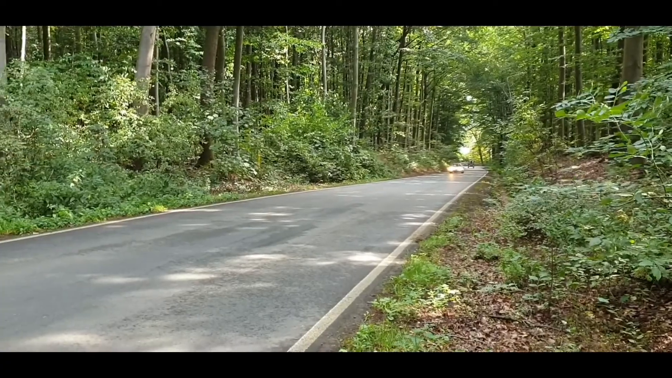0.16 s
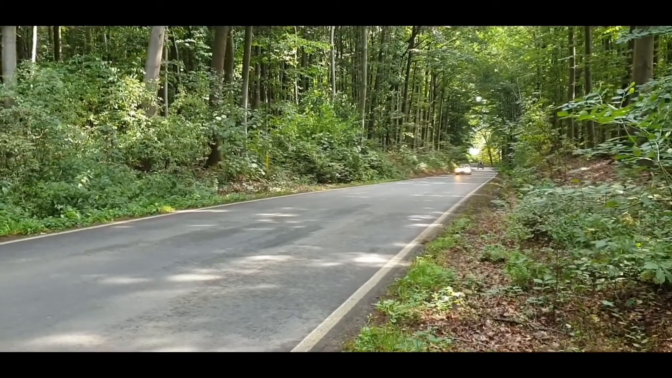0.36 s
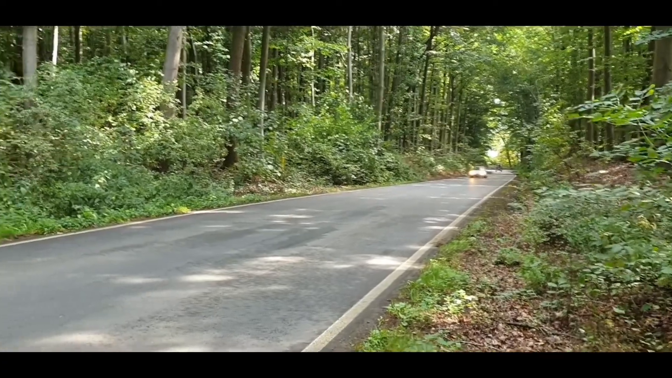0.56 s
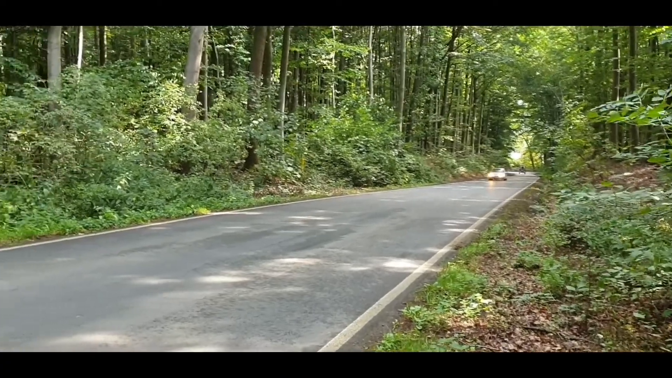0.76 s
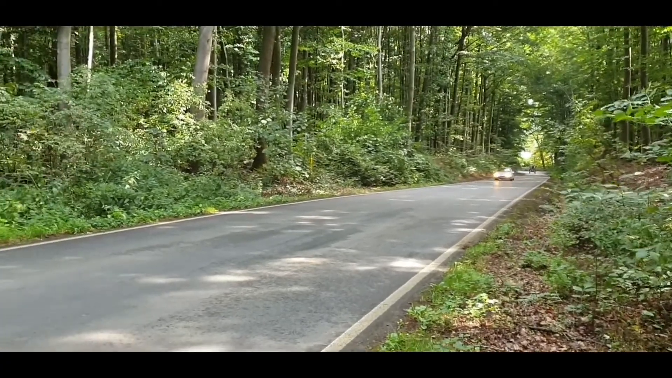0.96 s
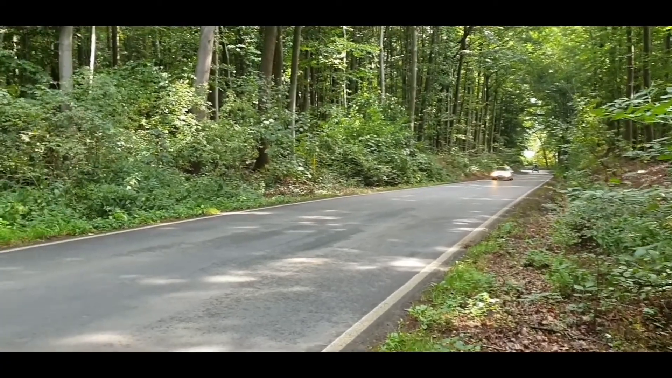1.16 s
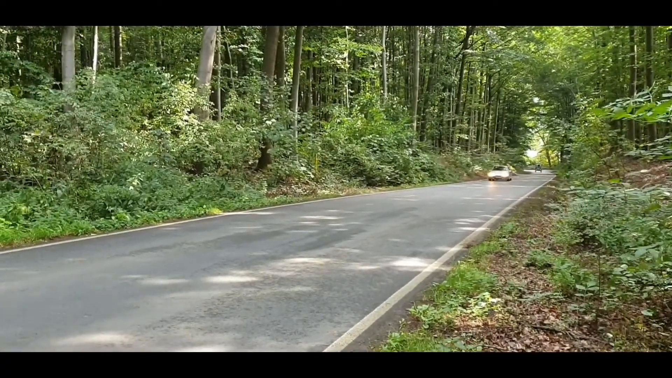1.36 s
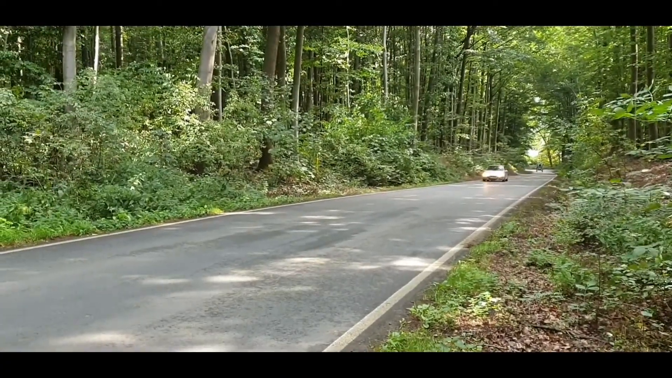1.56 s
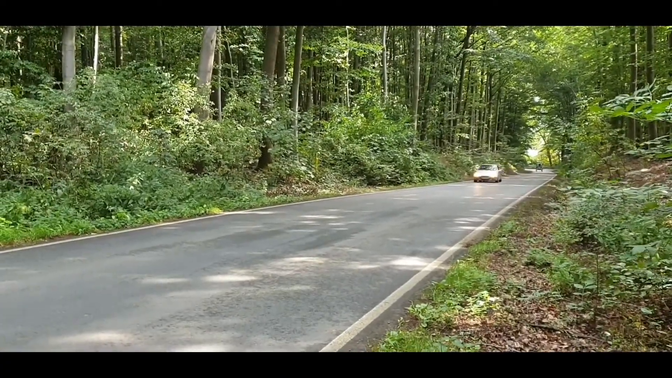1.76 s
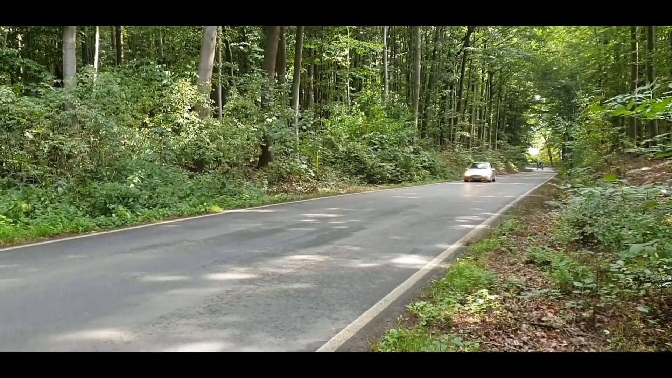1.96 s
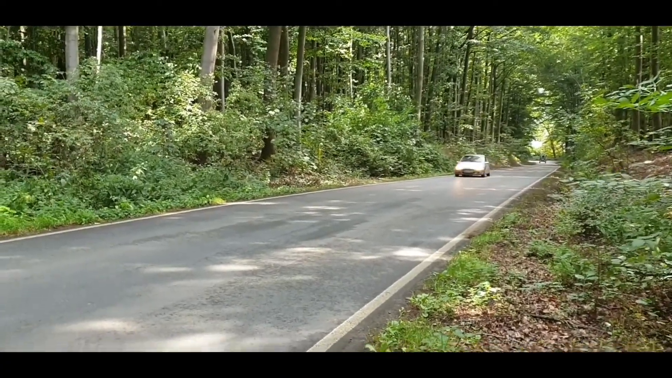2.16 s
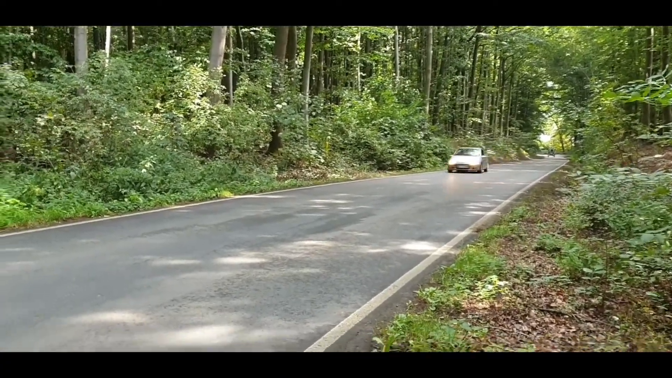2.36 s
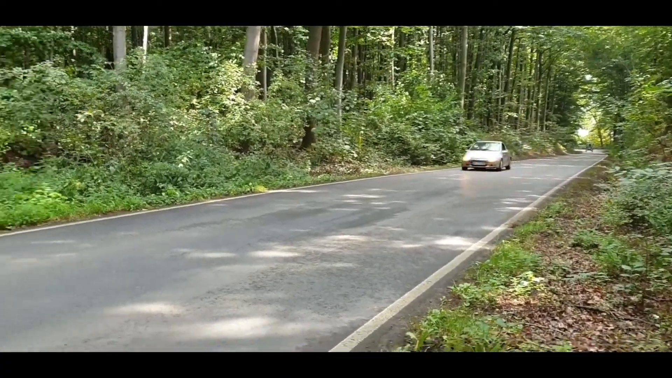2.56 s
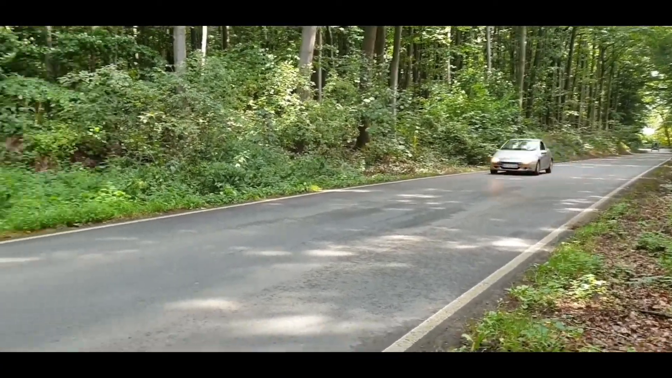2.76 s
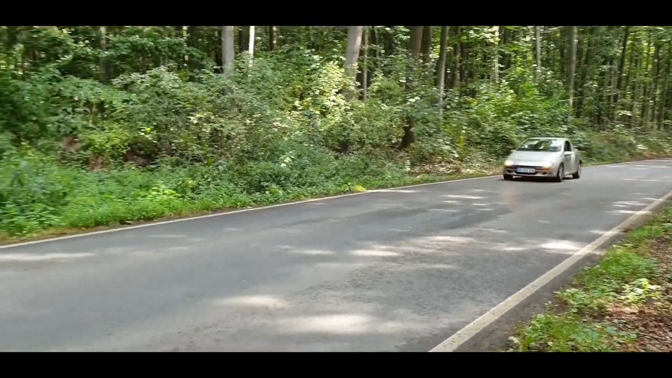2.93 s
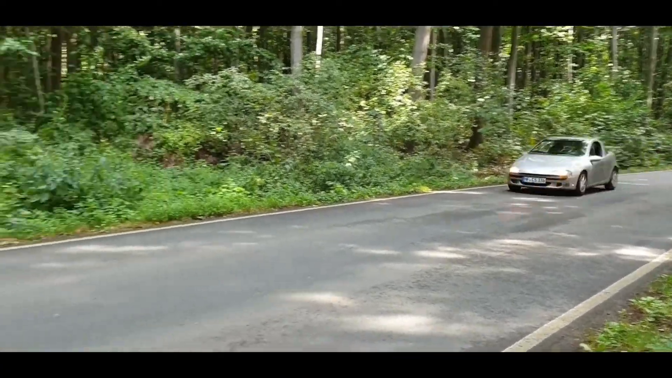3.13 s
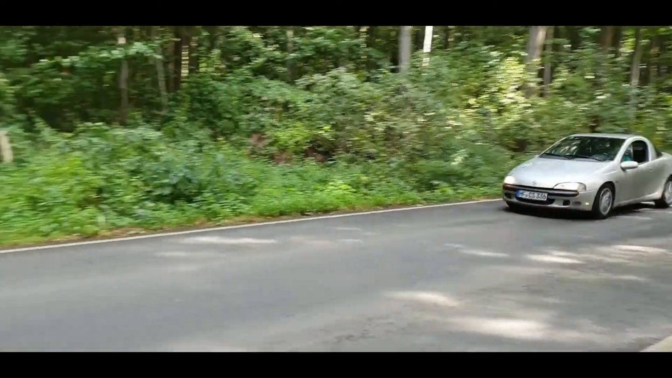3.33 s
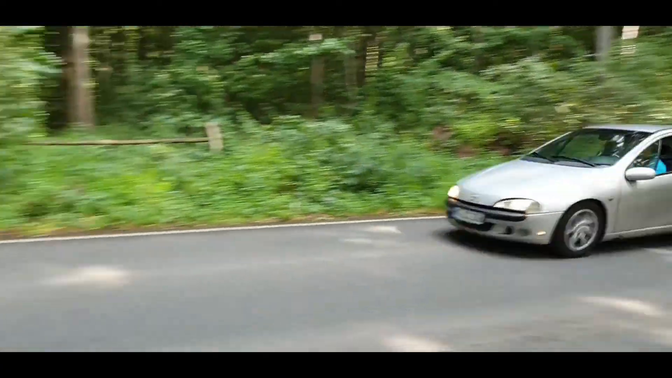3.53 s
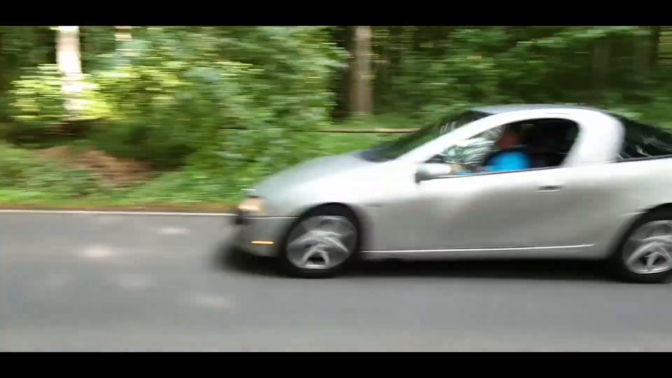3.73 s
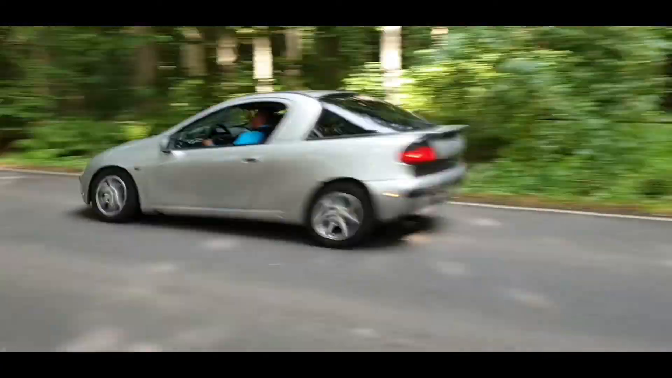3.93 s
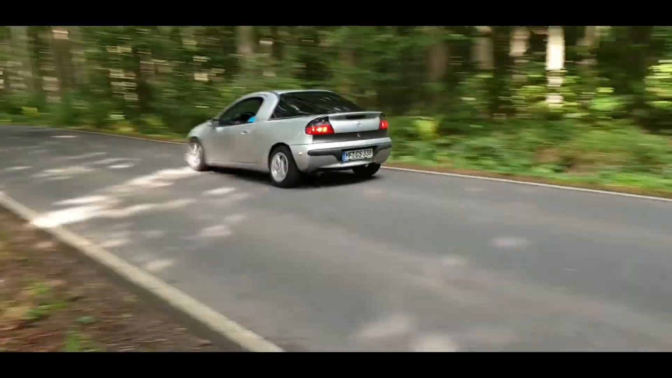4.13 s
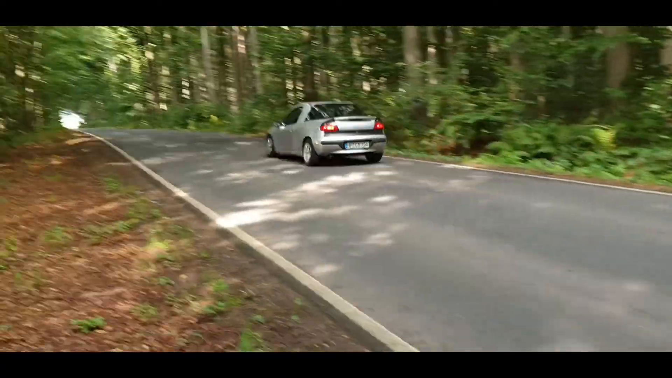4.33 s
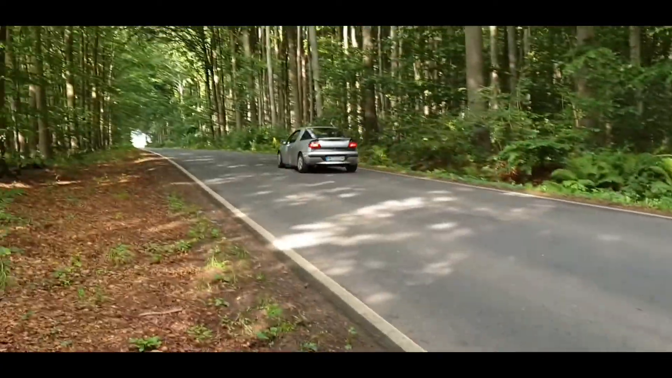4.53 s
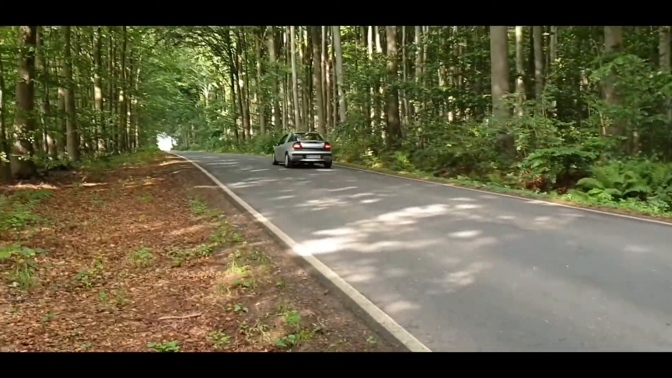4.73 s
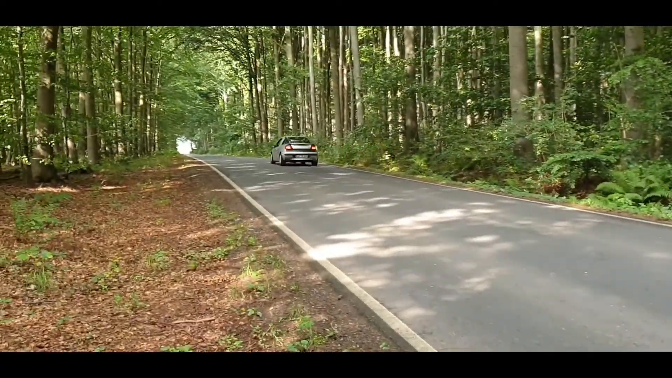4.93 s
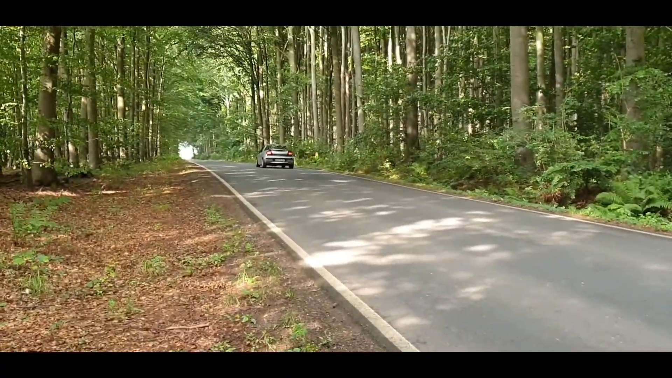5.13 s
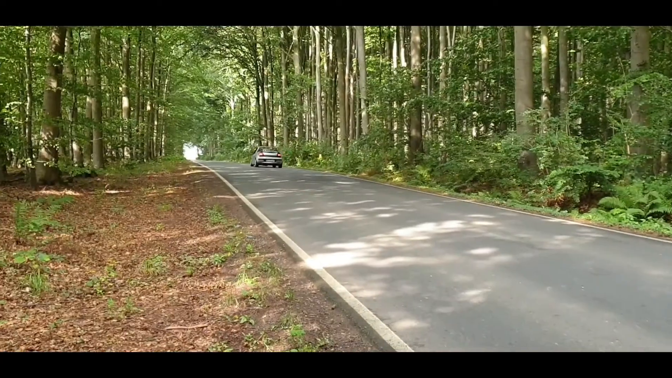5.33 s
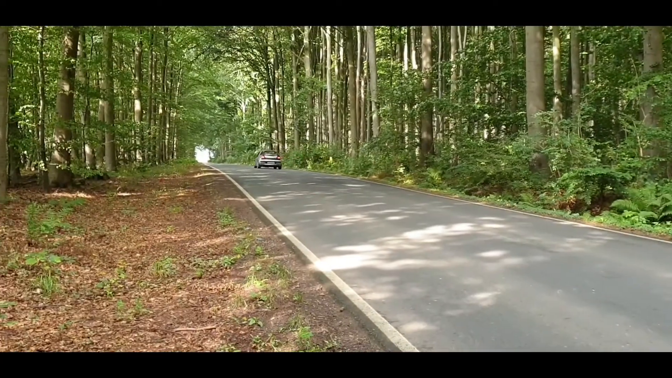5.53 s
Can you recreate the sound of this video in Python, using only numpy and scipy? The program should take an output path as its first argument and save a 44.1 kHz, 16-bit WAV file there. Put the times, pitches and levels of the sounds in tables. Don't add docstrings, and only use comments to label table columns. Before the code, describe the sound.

Outdoors on a forest road, a small four-cylinder car approaches, its engine hum rising steadily under rough tyre roar. It passes a few metres away just before four seconds, the pitch sags, and tyre hiss trails off into the distance. Early on, leaves rustle and twigs snap at the left, while low wind thumps buffet the stereo microphone, mostly its left side.

```python
import sys
import numpy as np
from scipy import signal
from scipy.io import wavfile
from scipy.ndimage import uniform_filter1d, map_coordinates

SR = 44100
rng = np.random.default_rng(int(sys.argv[2]) if len(sys.argv) > 2 else 0)


def field_ratio(decibels):
    return 10 ** (np.asarray(decibels, dtype=float) / 20)


def generate_wav(sig):
    pcm = np.round(np.clip(np.atleast_2d(sig).T, -1, 1) * 32767).astype(np.int16)
    wavfile.write(sys.argv[1], SR, pcm)


N = 250929
STEP = 40

PASS_S, SPEED_M_PER_S, GAIN_M_PER_S2, GAP_M = 3.834, 13.91, 0.96, 3.26
NOSE_M = 0.97
PLACES_M = [-45, -25, -13.5, -5.5, 0.56, 6, 24]
# time in seconds, rate in Hz.
CYCLE = [(0.0, 31.2), (0.13, 31.43), (2.25, 35.01), (2.85, 36.05), (3.31, 36.8), (3.53, 36.56),
         (3.69, 36.14), (3.88, 34.72), (4.02, 33.9), (4.5, 34.06), (4.79, 34.63), (4.86, 34.4),
         (5.48, 35.06), (5.69, 35.8)]
# time in seconds, view (0 head-on, 1 front quarter, 2 alongside,
# 3 behind), left lag in samples, diffuse share 0-1, treble lean to the left in dB.
BEARING = [(0, 0.06, 3.5, 0.8, 0), (1, 0.034, 6, 0.2, 3.5), (2.8, 0.16, 5.5, 0.21, 2.5),
           (3.3, 0.86, 8.5, 0.53, 1.5), (3.65, 1.68, 7.5, 0.7, 0.5), (3.85, 1.38, 5.5, 1, 1),
           (4.05, 2.21, 3.5, 0.7, 1), (4.17, 2.28, 1, 0.4, -1), (4.3, 2.76, 1.4, 0.1, -1.5),
           (4.8, 2.66, 2.5, 0.3, 1), (5.69, 2.52, 2, 0.9, -1.5)]

ORDER_LEVELS = {3: [-26, -27, -21, -21, -23.5, -26.5, -31], 4: [-20.5, -11.5, -17, -13, -15, -17, -18], 5:
                [-32, -21.5, -23, -25, -20, -28, -31], 6: [-37.5, -20, -20.5, -20, -21, -22, -29], 7:
                [-30.5, -25, -28, -25.5, -33, -36, -38.5], 8: [-18, -20, -19, -20, -24.5, -30.5, -58], 11:
                [-41, -26, -23.5, -26, -29.5, -46.5, -43.5], 12: [-35.5, -35, -30, -36.5, -40, -37.5, -51],
                13: [-41, -56.5, -49, -44, -58, -47, -56], 15: [-36, -40, -43, -50.5, -54.5, -55, -52], 9:
                [-31, -27, -38, -32, -58, -56, -55], 17: [-35, -42.5, -57, -50, -60, -59, -49]}
FOLLOWERS = {10: 11, 14: 15, 16: 15, 18: 17, 2: 3}
FOLLOWER_DB = [-9.5, -1, -13, -9, -23]

TYRE_LEVELS = [
    [-39, -35.5, -38.5, -44.5, -46.5, -40.5, -44.5],
    [-29, -27, -28, -27.5, -36, -30.5, -31],
    [-26, -22, -24, -27.5, -41, -35, -33],
    [-31.5, -26, -30.5, -37, -42.5, -39, -39.5],
    [-60.5, -59, -54, -51.5, -54, -52, -54],
]
REGION_TOPS_HZ = [620, 1300, 2500, 6000]
# frequency in Hz, level in dB per Hz.
HEAD_ON = [(260, -27.5), (450, -10.5), (610, -1.5), (737, -0.5), (828, -3), (1300, -6.5), (1810, -2.5),
           (2190, -7.5), (3190, -13.5), (3590, -13), (5380, -30), (6600, -48), (10300, -50), (13200, -57),
           (14400, -83)]
# frequency in Hz, level in dB per Hz.
FRONT_QUARTER = [(260, -10), (450, -12), (543, -13), (568, -13), (685, -9.5), (877, -5.5), (1210, -5.5),
                 (1420, -9), (1790, -4.5), (2160, -4), (2490, -17), (4720, -29), (7520, -47.5),
                 (12100, -31), (14400, -37)]
# frequency in Hz, level in dB per Hz.
ALONGSIDE = [(260, -22), (450, -4), (505, -14), (576, -17), (793, -8.5), (1220, -8), (2100, -13),
             (2460, -18.5), (2760, -12.5), (4030, -18), (4720, -13.5), (5700, -26), (9620, -32.5),
             (11100, -24.5), (14400, -33)]
# frequency in Hz, level in dB per Hz.
BEHIND = [(260, -31.5), (450, -15.5), (576, -9.5), (695, 6), (804, -6.5), (1030, -15.5), (1340, -11),
          (1810, -12), (2040, -21.5), (2290, -21.5), (3190, -22.5), (4520, -27), (6990, -30.5),
          (12000, -32), (14400, -39)]
# frequency in Hz, level in dB added to every view.
RUMBLE = [(90, -23), (160, 12), (300, 25), (450, 7.5)]
# frequency in Hz, width in octaves, then the rise in dB head-on,
# front quarter, alongside and behind.
RESONANCES = [(1766, 0.028, 7.5, 9, -6, 7.5), (3184, 0.052, 2, 1.5, 5, -6), (3700, .06, -5.5, -1, 5, -1),
              (4110, 0.049, 2, 2, 12, 1.5), (4750, .04, 1, -1.5, 1.5, 0)]
SLIDE_HZ = [980, 950, 825, 770]
SLIDE_DB = [.1, 2.8, 3.2, 2.5]
SLIDE_OCTAVES = 0.15
# time in seconds, half length in seconds,
# rise of roar, hiss and sizzle in dB.
GRIT = [
    (3.394, 0.066, 3, .1, .1),
    (3.72, .05, -1.3, 0.66, 2.5),
    (3.827, 0.0091, 0.5, 0.29, 4),
    (3.936, 0.015, 1, .3, 3.3),
    (4.1, 0.08, -1, 5.8, 5),
    (4.316, 0.031, 1.5, .1, 1.7),
    (5.53, .015, 3, 1.88, 4.8),
]
# frequency in Hz, likeness 0-1.
LIKENESS = [(100, .995), (600, .985), (1200, .98), (3000, .93), (5500, .8), (7500, .25), (14000, .03)]
# frequency in Hz, left minus right in dB.
CAR_LEAN = [(60, 1), (160, 1.26), (300, 2), (600, 4), (1100, 1.9), (2100, 3), (4200, -4), (8000, 19.5),
            (12500, -3)]

# time in seconds, level in dB, left minus right in dB.
BREEZE = [
    (0, -45.5, 15),
    (.5, -41.5, 4.5),
    (.9, -47, 7),
    (1.5, -45.5, 11),
    (2.5, -46.5, 5),
    (4.2, -40.5, 9),
    (4.75, -48, 5),
    (5.08, -54, 5),
    (5.69, -55, -5),
]
# frequency in Hz, level in dB per Hz.
BREEZE_COLOUR = [(20, -25), (35, -21), (55, 4), (80, -7), (120, -6), (200, -22), (400, -32)]
# time in seconds, peak in dB, frequency in Hz, left minus right in dB.
EDDIES = [(0.07, -38, 92, 12), (0.109, -72, 61.9, 25), (0.299, -31, 51.1, 17), (0.426, -17, 68, 24),
          (0.48, -22, 65, 2), (0.657, -24, 106, 5), (1.239, -25, 67.3, 15), (1.614, -60, 108, 8),
          (1.848, -17, 61.6, 21.0), (2.787, -16, 107.8, 3), (4.269, -20, 75.12, 11.5), (4.699, -35, 108, 3)]
SWELL_DB, SWELL_PAN_DB, SWELL_S = 5, -2, 0.03

# time in seconds, level in dB, rise in seconds, left minus right in dB.
FOOTSTEPS = [
    (0.001, -67, .01, 25),
    (.068, -58.5, 0.0062, 36),
    (.386, -60, 0.044, 44),
    (.512, -66.5, 0.01, 28),
    (.912, -78, .015, 13),
]
# frequency in Hz, level in dB per Hz.
LEAF_COLOUR = [(2500, 0), (4000, 1), (6000, -7.5), (8500, -3), (11000, -5.5), (14500, -15)]
SETTLE_DB_PER_S = 78
# time in seconds, peak in dB, left minus right in dB.
SNAPS = [
    (0.068, -36, 5),
    (0.0916, -45, 9),
    (0.3126, -54, 13),
    (0.3585, -36, 13),
    (0.3812, -28, 16),
    (0.383, -26.5, 19),
    (0.9127, -53, 34),
]
# frequency in Hz, level in dB, time to fade by 60 dB in seconds.
TWIG_TONES = [(3300, 0, .005), (3950, 1, .008), (4700, -10, 0.0044), (7500, -8, 0.0052), (8530, 3, 0.0058),
              (10500, -11, 0.0056)]


def engine(wobble_db, spread, uneven, ahead_s):
    cycle_hz, = in_time(CYCLE)
    levels = {}
    for order, pattern_db in ORDER_LEVELS.items():
        levels[order] = heard_db(pattern_db, NOSE_M * (order >= 9))
    followed = {}
    for (order, leader), db in zip(FOLLOWERS.items(), FOLLOWER_DB):
        followed[order] = levels[leader] + db
    levels.update(followed)
    tail = 2 * np.pi * np.cumsum(fine(cycle_hz)) / SR
    view = uniform_filter1d(in_time(BEARING)[0], size=300)
    nose = tail + fine(2 * np.pi * cycle_hz * ahead_s * np.cos(np.pi / 3 * view))
    out = 0
    for order, level_db in levels.items():
        lag = spread * order ** 2 - uneven * (order % 2)
        phase = tail if order < 7 else nose
        wave = np.sin(order * phase - lag + fine(.12 * drift(5)))
        wave *= fine(np.sqrt(2) * field_ratio(level_db + wobble_db * drift(7)))
        out = out + np.outer(sides(at_hz(CAR_LEAN, 35 * order)), wave)
    return out


def tyre_gains(centres, edges, view):
    views_db = np.array([at_hz(s, centres) for s in (HEAD_ON, FRONT_QUARTER, ALONGSIDE, BEHIND)])
    views_db += at_hz(RUMBLE, centres)
    for hz, octaves, *rise_db in RESONANCES:
        views_db += np.outer(rise_db, np.exp(-.5 * (np.log2(centres / hz) / octaves) ** 2))
    gains = field_ratio([np.interp(view, (0, 1, 2, 3), v) for v in views_db.T])
    gains *= np.sqrt(np.diff(edges))[:, None]
    slide_hz = np.interp(view, np.arange(4), SLIDE_HZ)
    slide_db = np.interp(view, np.arange(4), SLIDE_DB)
    octaves_off = np.log2(centres[:, None] / slide_hz)
    gains *= field_ratio(slide_db * np.exp(-.5 * (octaves_off / SLIDE_OCTAVES) ** 2))

    s, half_s, *thrown_db = np.transpose(GRIT)
    roar_db, hiss_db, sizzle_db = (bumps(s, half_s, db) for db in thrown_db)
    extra_db = [0, roar_db, 0, hiss_db, sizzle_db]
    region = np.searchsorted(REGION_TOPS_HZ, centres)
    for k, (pattern_db, more_db) in enumerate(zip(TYRE_LEVELS, extra_db)):
        counted = (region == k) & (centres > 450)
        total = np.sqrt((gains[counted] ** 2).sum(0))
        gains[region == k] *= field_ratio(heard_db(pattern_db) + more_db) / total
    return gains


def tyres(patchy_db, throb):
    view, _, diffuse, lean_db = in_time(BEARING)
    edges = np.r_[np.geomspace(95, 450, 9), np.geomspace(450, 15000, 39)[1:]]
    centres = np.sqrt(edges[1:] * edges[:-1])
    gains = tyre_gains(centres, edges, view)
    turning = np.cos(2 * np.pi * np.cumsum(in_time(CYCLE)[0]) * 2 * STEP / SR)
    together = drift(4.8)
    out = np.zeros((2, 2, N))
    for hz, gain, (mid, side) in zip(centres, gains, bank(edges, order=3)):
        gain = gain * field_ratio(patchy_db * (together * hz / 9000 + drift(32)))
        gain = gain * (1 + throb * turning * (hz > 3500))
        if hz > 5800:
            gain = gain * field_ratio(2.2 * np.clip(2 - view, 0, 1) * drift(30))
        alike = np.clip(at_hz(LIKENESS, hz) * (1 - diffuse * min(hz / 4000, 1) ** 2), 0, 1)
        mid = mid * fine(gain)
        side = side * fine(gain * np.sqrt((1 - alike) / (1 + alike)))
        left, right = sides(at_hz(CAR_LEAN, hz))
        treble = int(hz > 2800)
        out[treble, 0] += left * (mid + side)
        out[treble, 1] += right * (mid - side)
    return out[0] + out[1] * [fine(g) for g in sides(lean_db)]


def wind(lumpy_db, shared, cycles):
    swell = bumps(np.array(EDDIES)[:, 0], [SWELL_S], [1])
    level_db, pan_db = in_time(BREEZE) + np.outer([SWELL_DB, SWELL_PAN_DB], swell)
    out = coloured(BREEZE_COLOUR, count=9) * [fine(field_ratio(lumpy_db * drift(5.0))) for side in "LR"]
    out = out + shared * out[::-1]
    out = out * [fine(g) for g in field_ratio(level_db + 5.5) * sides(pan_db)]
    t = np.arange(SR // 8) / SR
    for s, peak_db, hz, pan_db in EDDIES:
        phase = t * hz - cycles / 2
        bell = np.exp(-(1.43 * phase / cycles) ** 2)
        thump = field_ratio(peak_db - 9.5) * bell * np.sin(2 * np.pi * phase)
        start = round(s * SR)
        out[:, start:start + len(t)] += np.outer(sides(pan_db), thump)
    return out


def leaves(grain_db):
    gains = 0
    for s, level_db, rise_s, pan_db in FOOTSTEPS:
        t = clock() - s
        rise = np.exp(-(t / rise_s) ** 2)
        settle = field_ratio(-SETTLE_DB_PER_S * t.clip(0))
        shape = np.where(t < 0, rise, settle)
        gains = gains + np.outer(sides(pan_db), field_ratio(level_db + 1.5) * shape)
    return coloured(LEAF_COLOUR, count=8) * [fine(g) for g in gains * field_ratio(grain_db * drift(150))]


def twigs():
    bursts = rng.standard_normal((len(SNAPS), 90)) * np.hanning(90)
    clicks = np.zeros((2, N)) + 1e-18
    for (s, peak_db, pan_db), grains in zip(SNAPS, bursts):
        start = round(s * SR)
        clicks[:, start:start + 90] += field_ratio(peak_db - 26) * grains * sides(pan_db)[:, None]
    out = np.zeros((2, N))
    for hz, level_db, t60 in TWIG_TONES:
        r = field_ratio(-60 / (t60 * SR))
        w = 2 * np.pi * hz / SR
        out += field_ratio(level_db) * signal.lfilter([0, np.sin(w)], [1, -2 * r * np.cos(w), r * r], clicks)
    return out


def heard_db(pattern_db, ahead_m=0):
    t = clock() - PASS_S
    along = (ahead_m + SPEED_M_PER_S * t + GAIN_M_PER_S2 * t ** 2 / 2) / GAP_M
    places = np.arcsinh(np.sort(PLACES_M) / GAP_M)
    return np.interp(np.arcsinh(along), places, pattern_db) - 10 * np.log10(1 + along ** 2)


def arrive(x, share):
    moments = np.arange(N) - share * fine(in_time(BEARING)[1])
    late = map_coordinates(x[0], [moments], order=3, mode="nearest")
    return np.array([late, x[1]])


def sides(pan_db):
    left, right = field_ratio(pan_db / 2), field_ratio(-pan_db / 2)
    return np.array([left, right]) * 2 / (left + right)


def bank(edges, order=2):
    white = rng.standard_normal((2, 2, N))
    for k, (low, high) in enumerate(zip(edges, edges[1:])):
        band = signal.butter(order, [low, high], "band", fs=SR, output="sos")
        pair = signal.sosfilt(band, white[k % 2])
        yield pair / pair[:, ::7].std()


def coloured(points, count):
    edges = np.geomspace(points[0][0], points[-1][0], count + 1)
    gains = field_ratio(at_hz(points, np.sqrt(edges[1:] * edges[:-1]))) * np.sqrt(np.diff(edges))
    out = sum(g * pair for g, pair in zip(gains, bank(edges)))
    return out / out.std()


def drift(rate):
    r = np.exp(-2 * np.pi * STEP * rate / SR)
    slow = signal.lfilter([1], [1, -2 * r, r * r], rng.standard_normal(N // STEP + 2002))[2000:]
    return slow / slow.std()


def bumps(s, half_s, height):
    bells = np.exp(-((clock() - np.c_[s]) / np.c_[half_s]) ** 2)
    return (np.c_[height] * bells).sum(axis=0)


def at_hz(points, hz):
    table = np.array(points)
    return np.interp(np.log(hz), np.log(table[:, 0]), table[:, 1])


def in_time(rows):
    s, *columns = np.transpose(rows)
    return np.array([np.interp(clock(), s, c) for c in columns])


def clock():
    return np.arange(N // STEP + 2) * STEP / SR


def fine(control):
    return np.interp(np.arange(N) / STEP, np.arange(len(control)), control)


def scene():
    motor = arrive(engine(wobble_db=1.25, spread=.25, uneven=0.98, ahead_s=.0015), share=0.6)
    road = arrive(tyres(patchy_db=1.28, throb=0.027), share=0.92)
    air = wind(lumpy_db=2.0, shared=.15, cycles=1.8)
    return motor + road + air + leaves(grain_db=2.0) + twigs()


def top_cut(x):
    return signal.sosfilt(signal.butter(12, 14590, fs=SR, output="sos"), x)


def record(dry):
    low_pass = signal.cheby2(12, 50, 1.035 * 14590, fs=SR, output="sos")
    mix = signal.sosfilt(low_pass, dry)
    return top_cut(mix)


dry = scene()
out = record(dry)
generate_wav(out)
```